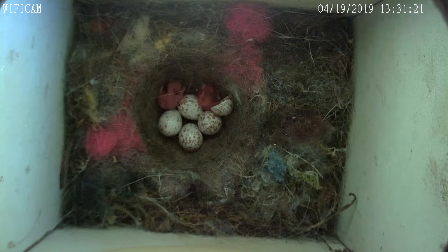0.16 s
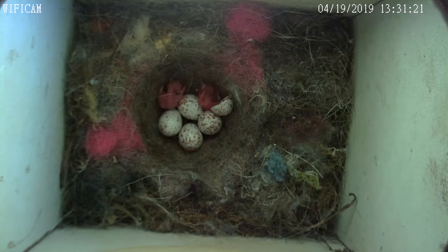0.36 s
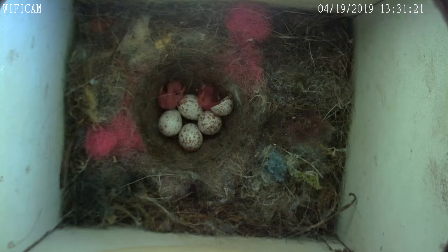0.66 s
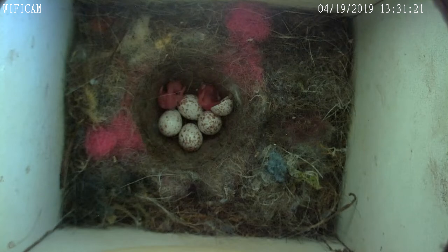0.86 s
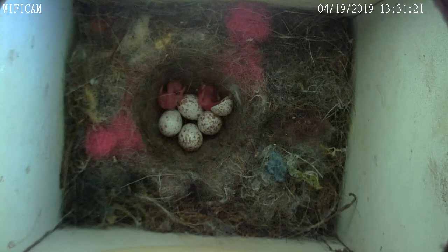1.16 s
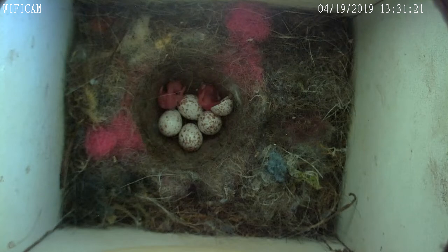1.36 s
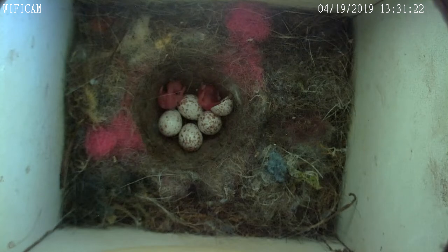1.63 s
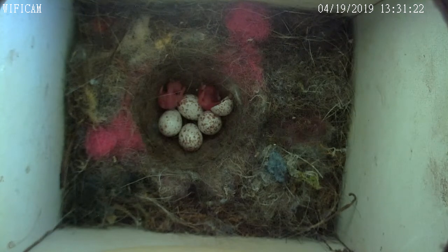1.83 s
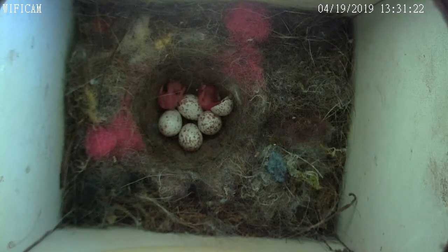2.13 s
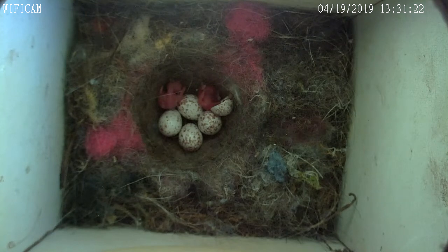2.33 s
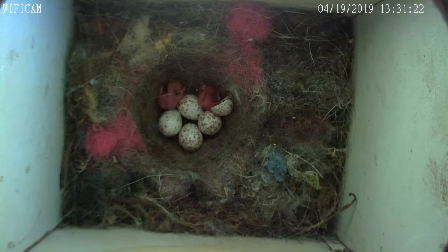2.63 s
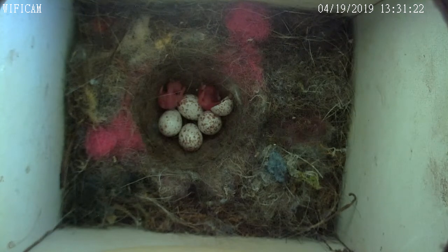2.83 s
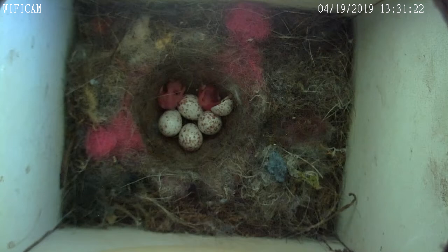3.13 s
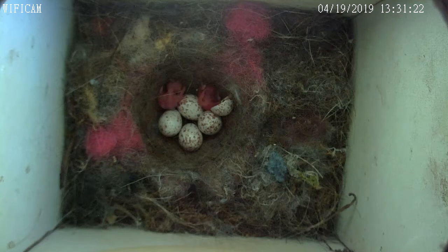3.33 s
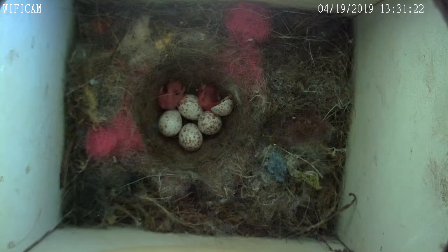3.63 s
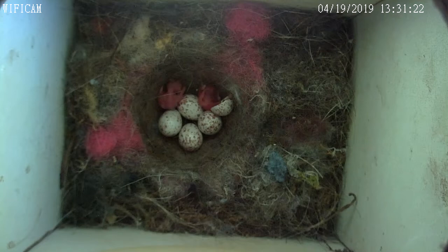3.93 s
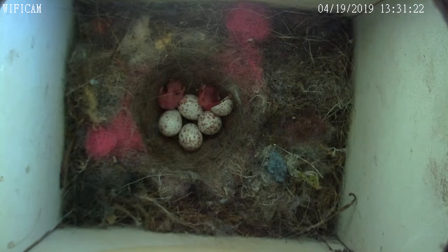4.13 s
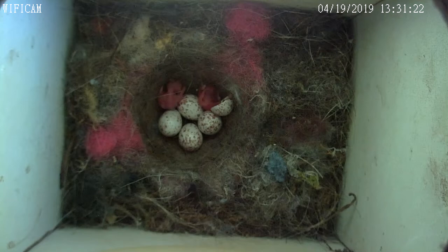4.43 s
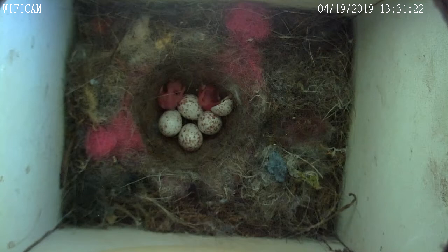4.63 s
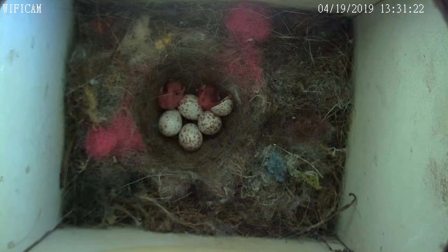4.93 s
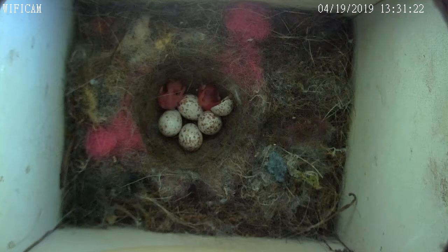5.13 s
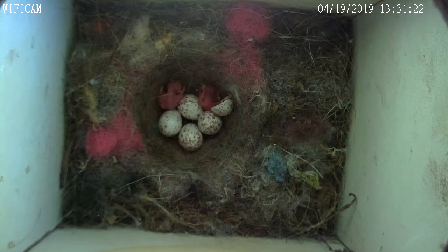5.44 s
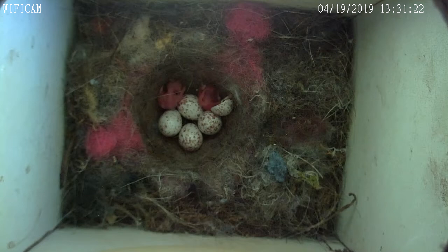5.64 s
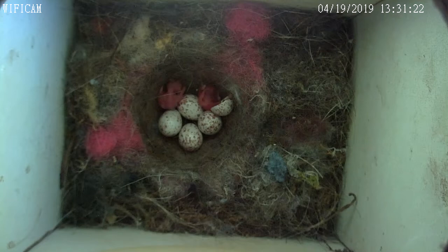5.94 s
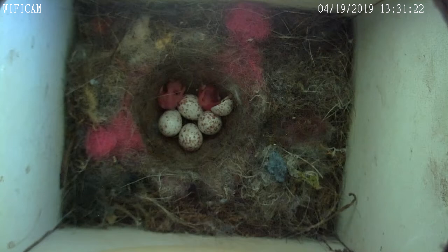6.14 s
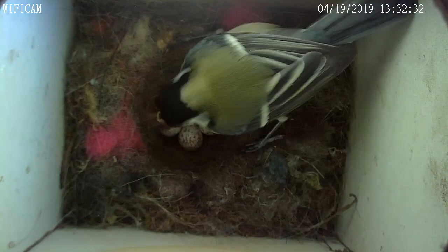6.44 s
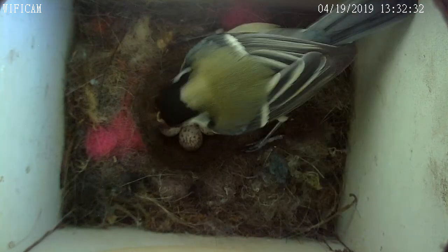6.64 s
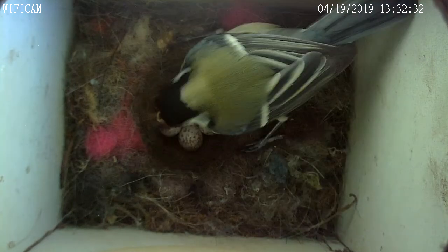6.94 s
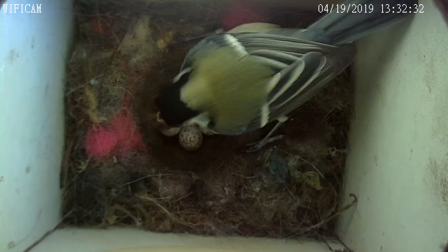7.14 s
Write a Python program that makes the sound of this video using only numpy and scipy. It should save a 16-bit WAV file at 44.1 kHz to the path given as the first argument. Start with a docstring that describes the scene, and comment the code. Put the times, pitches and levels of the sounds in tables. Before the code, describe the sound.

A near bird's short sliding whistles and other birds' rapid chirping echo lightly outdoors above a quiet brook-like trickle with small drips and gurgles.

```python
"""From the start a brook trickles over a slow subsonic wobble: noise bands hiss, ringing bubbles climb in pitch.
At once small birds twitter farther off in a garden and a songbird whistles close by on the left: gliding sines.
Fluttering notes (modulated sines) soon join, then ticking drops and gliding large bubbles, later spray of
high-passed noise. Decaying noise gives the birds their echoes. The song's last short note comes at the very
end, over the running brook."""
import sys
import numpy as np
from scipy import signal
from scipy.io import wavfile
from scipy.ndimage import uniform_filter1d

SR = 44100
rng = np.random.default_rng(int(sys.argv[2]) if len(sys.argv) > 2 else 0)


def master_out(mix):
    """Clip the mix to full scale and print it as 16-bit PCM to the path in sys.argv[1]."""
    frames = np.transpose(np.atleast_2d(mix))
    ceiling = np.clip(frames, -1, 1)
    pcm = np.round(ceiling * 32767).astype(np.int16)
    wavfile.write(sys.argv[1], SR, pcm)


N = 321489


def amp(db):
    """Level definition: 20 dB are a factor of ten in amplitude."""
    return 10 ** (np.asarray(db) / 20)


def rms_one(x):
    """Normalisation to unit root mean square."""
    return x / np.sqrt(np.mean(x ** 2) + 1e-20)


def at_hz(points, hz):
    """Interpolation of a spectrum along a logarithmic frequency axis."""
    table = np.array(points)
    return np.interp(np.log(hz), np.log(table[:, 0]), table[:, 1])


def panned(x, pan_db):
    """Intensity stereophony: left and right differ by pan_db and their mean stays x."""
    left = 2 / (1 + amp(-pan_db))
    return x * np.array([[left], [2 - left]])


def drift(rate_hz):
    """Random modulation: noise through a double pole at rate_hz wanders slowly with unit rms."""
    step = 40   # samples between computed values
    pole = np.exp(-2 * np.pi * rate_hz * step / SR)
    noise = rng.standard_normal(N // step + 2002)
    slow = signal.lfilter([1], [1, -2 * pole, pole * pole], noise)[2000:]   # settled part only
    return np.interp(np.arange(N) / step, np.arange(len(slow)), rms_one(slow))


def unsteady(cut_hz):
    """Modulation sidebands: multiplied by low-passed noise, a tone smears into a band."""
    low_pass = signal.butter(2, cut_hz, fs=SR, output="sos")
    return rms_one(signal.sosfilt(low_pass, rng.standard_normal(N)))


def add(out, start_s, sound):
    """Superposition: a stereo sound is summed in at its time."""
    i = max(round(start_s * SR), 0)
    out[:, i:i + sound.shape[1]] += sound[:, :N - i]


def whistle(s, hz, db, edge_s):
    """Frequency modulation: phase integrates a rounded glide; the tone starts edge_s before its first point."""
    t = np.arange(s[0] - edge_s, s[-1] + edge_s, 1 / SR)
    pitch = uniform_filter1d(np.interp(t, s, hz), size=150, mode="nearest")
    fade = np.clip(np.minimum(t - t[0], t[-1] - t) / (2 * edge_s), 0, 1)
    level = amp(np.interp(t, s, db)) * np.sin(fade * np.pi / 2) ** 2
    phase = 2 * np.pi * np.cumsum(pitch) / SR
    return np.sqrt(2) * level * np.sin(phase)


# subsonic swings: (frequency [Hz], level [dB rms])
WOBBLE_TONES = [(3.9, -53), (5.8, -51), (11.7, -60.5)]


def wobble():
    """Infrasound: steady sines below hearing, in phase in both channels."""
    t = np.arange(N) / SR
    tones = []
    for hz, db in WOBBLE_TONES:
        tones.append(np.sqrt(2) * amp(db) * np.sin(2 * np.pi * (hz * t + rng.random())))
    return sum(tones)


# relative power spectrum of the water hiss: (frequency [Hz], density [dB per Hz])
HISS_SPECTRUM = [(12, -30), (20, -20.5), (36, -19), (59, -21), (112, -35), (289, -33.5), (565, -32.5),
                 (2920, -29.5), (4430, -39), (5530, -38), (11400, -46.5), (15500, -50)]
# likeness of left and right: (frequency [Hz], correlation [-1 to 1])
HISS_LIKENESS = [(30, 0.31), (150, 0.87), (400, 0.37), (2000, 0.29), (10000, 0.19)]


def water_hiss(patchy_db):
    """Band-filtered noise: half-octave bands, each with its own level, flicker and stereo correlation."""
    out, together = 0, drift(6)
    edges = 20 * 2 ** np.arange(0, 10.1, .5)
    white = rng.standard_normal((2, 2, N))   # neighbouring bands take turns between two noises
    for k, (low, high) in enumerate(zip(edges, edges[1:])):
        band = signal.butter(2, [low, high], "band", fs=SR, output="sos")
        mid, side = signal.sosfilt(band, white[k % 2])
        hz = np.sqrt(low * high)
        alike = np.clip(at_hz(HISS_LIKENESS, hz), -1, 1)
        flicker_db = patchy_db * (.8 * together + drift(23))
        gain = amp(at_hz(HISS_SPECTRUM, hz) + flicker_db)
        out = out + gain * (np.sqrt(1 + alike) * mid + np.sqrt(1 - alike) * side * [[1], [-1]])
    return rms_one(out)


def small_bubbles(count, low_hz, high_hz, cycles, rise, tilt_db, spread_db):
    """Damped resonance: bubbles at random times and places ring a few cycles while their pitch climbs."""
    out = np.zeros((2, N))
    for when, size, loud, place, climb in rng.random((count, 5)):
        hz = low_hz * (high_hz / low_hz) ** size
        turns = np.arange(int(cycles * SR / hz)) * hz / SR
        envelope = (1 - np.exp(-turns)) * amp(-40 * turns / cycles)
        ring = envelope * np.sin(2 * np.pi * turns * (1 + rise * climb * turns / cycles))
        level_db = tilt_db * size - spread_db * np.log(loud + 0.029)
        add(out, when * N / SR, panned(ring * amp(level_db), 18 * (place - .45)))
    return rms_one(out)


# farther birds, a chirp a row: (start [s], length [s], start pitch [Hz], turn pitch [Hz], end pitch [Hz],
# place of the turn [0-1], level before swell and high loss [dB], left minus right [dB])
TWITTER_CHIRPS = [(0.035, 0.029, 4030, 4400, 4800, 0.75, -57.5, 6),
                  (0.089, .01, 2840, 3730, 2860, 0.4, -49.5, 8),
                  (0.496, 0.027, 3200, 3230, 4050, 0.8, -62, -4),
                  (0.642, .04, 3610, 3000, 2320, 0.56, -59.5, -1),
                  (0.786, 0.041, 4850, 5040, 4600, 0.5, -52.5, 9),
                  (.874, 0.027, 4700, 5000, 4070, .25, -55, 8),
                  (0.955, 0.027, 3720, 4650, 3870, .4, -61, -1),
                  (1.02, 0.017, 4050, 3950, 3600, 0.67, -54, 7),
                  (1.021, .009, 3110, 3100, 3020, .5, -56, 5),
                  (1.043, 0.0083, 3260, 3100, 2970, .5, -50.5, 5),
                  (1.04, 0.014, 4050, 4160, 3650, 0.8, -48, 7),
                  (1.065, 0.018, 3940, 3720, 3350, 0.5, -50.5, 12),
                  (1.086, .06, 3720, 3420, 3160, 0.7, -52.5, 6),
                  (1.087, 0.061, 2970, 2760, 2590, 0.4, -57, 3),
                  (1.311, 0.028, 3070, 3500, 3130, 0.36, -55, 5),
                  (1.329, .028, 2490, 3950, 4820, 0.13, -53, 6),
                  (1.359, 0.019, 4250, 4490, 4600, 0.5, -52, 6),
                  (1.417, 0.019, 4090, 4140, 2940, 0.36, -47, 7),
                  (1.441, .032, 3800, 3440, 2700, 0.59, -46.5, 4),
                  (1.477, 0.035, 3360, 3180, 4440, 0.4, -48.5, 2),
                  (1.763, 0.028, 3730, 2160, 3580, 0.7, -53.5, 13),
                  (1.767, .024, 4220, 3930, 3290, 0.26, -51, -1),
                  (1.814, 0.028, 2650, 3960, 4420, 0.54, -50, 0),
                  (1.884, 0.035, 3220, 4330, 4480, 0.22, -51, 7),
                  (1.952, 0.051, 4500, 4000, 4770, .42, -56, 2),
                  (1.99, 0.019, 4370, 4040, 3400, 0.72, -55.5, -1),
                  (1.992, 0.072, 2165, 1813, 1690, .36, -65, -2),
                  (2.222, 0.014, 3025, 2080, 3200, 0.36, -49.5, 8),
                  (2.292, 0.032, 4040, 4020, 4700, 0.4, -56, -1),
                  (2.325, 0.015, 4630, 3850, 3450, 0.46, -58, -1),
                  (2.373, 0.039, 2530, 4180, 4680, 0.39, -52.5, 5),
                  (2.464, .016, 5600, 4860, 3640, 0.43, -55, 5),
                  (2.59, 0.014, 2970, 3180, 4240, 0.54, -56, 4),
                  (2.601, 0.048, 2980, 4335, 4420, .4, -48.5, 8),
                  (2.691, 0.023, 3840, 3940, 3030, 0.33, -46, 8),
                  (2.718, 0.012, 2670, 2930, 3000, 0.43, -51.5, -1),
                  (2.73, 0.022, 3610, 3535, 2750, .4, -42, 6), (2.755, .012, 2750, 3200, 3420, .6, -41, 4),
                  (2.765, .006, 3320, 3000, 2670, 0.47, -46, 6),
                  (2.85, 0.036, 3740, 4360, 4370, 0.73, -48, 2),
                  (2.976, 0.029, 3800, 3960, 3380, 0.5, -49, 9),
                  (3.003, 0.0083, 4480, 3690, 2900, 0.46, -46.5, 4),
                  (3.025, 0.045, 2990, 3260, 4200, 0.44, -50.5, 2),
                  (3.113, .025, 2630, 2360, 2000, 0.8, -61, -1),
                  (3.8, 0.027, 2680, 2686, 2540, 0.8, -50.5, 2),
                  (4.525, 0.049, 3260, 3840, 3660, 0.44, -46.5, -1),
                  (4.798, 0.037, 3390, 3420, 3280, 0.37, -57.5, -1),
                  (4.867, 0.048, 2433, 2450, 2450, 0.9, -57.5, 0),
                  (4.938, 0.041, 5610, 6470, 3960, 0.63, -54, 2),
                  (5.196, 0.047, 2880, 3273, 3050, 0.88, -46, -1),
                  (5.254, 0.091, 2650, 3036, 3150, 0.57, -58, -5),
                  (5.317, 0.062, 1184, 1847, 2000, 0.26, -52.5, 4),
                  (5.482, 0.042, 2215, 2400, 2450, .3, -59.5, -4),
                  (5.7, 0.061, 2750, 3270, 3150, .7, -68, -18),
                  (5.74, 0.053, 2220, 2130, 2000, .5, -62, -5),
                  (5.84, 0.025, 2280, 2340, 2150, 0.5, -66, -10),
                  (5.918, 0.064, 3850, 3530, 3330, .45, -66.5, -11),
                  (5.93, 0.1, 1850, 1930, 1850, 0.54, -66.5, -17),
                  (6.128, 0.052, 2750, 2870, 2870, 0.26, -71.5, -22),
                  (6.255, 0.038, 3510, 3470, 3460, 0.55, -63.5, -13),
                  (6.492, 0.0063, 4340, 3430, 2930, 0.35, -53.5, -5),
                  (6.75, 0.055, 1770, 2360, 2510, 0.33, -58.5, 1)]
CHIRP_SWELL_DB = 5   # a chirp starts this far under its level
HIGH_LOSS_DB, BRIGHT_HZ = 5, 3200   # loss per octave over this pitch
SCRATCH, SCRATCH_PER_OCTAVE = .28, 1.7   # share of noise in a chirp, and its growth per octave over 4 kHz


def chirps():
    """Frequency sweep: notes glide through a turn; higher ones are weaker and smeared more by noise."""
    out, scratch = np.zeros((2, N)), unsteady(330)
    for start, length, from_hz, turn_hz, to_hz, turn, db, pan_db in TWITTER_CHIRPS:
        share = np.array([0, np.clip(turn, .05, .95), 1])
        hz = np.array([from_hz, turn_hz, to_hz])
        octaves_over = max(np.log2(turn_hz / 4000), 0)
        rough = np.clip(SCRATCH + SCRATCH_PER_OCTAVE * octaves_over, 0, 1)
        high_loss_db = HIGH_LOSS_DB * np.maximum(np.log2(hz / BRIGHT_HZ), 0)
        level_db = db - CHIRP_SWELL_DB * (share == 0) - high_loss_db
        note = whistle(start + length * share, hz, level_db, .004)
        noise = scratch[round(start * SR):][:len(note)]
        note = note * (np.sqrt(1 - rough ** 2) + rough * noise)
        add(out, start - .004, panned(note, pan_db))
    return out


# near singer, a note a row: (peak level before low loss [dB], time of the peak [s],
# glide as a list of (time [s], pitch [Hz]))
SONG_NOTES = [(-41, .11, [(.04, 1843), (.11, 2141), (.25, 2219), (.295, 2094)]), (-52, 0.597, [(.534, 3160),
              (.544, 2680), (.6, 2380)]), (-43, 1.572, [(1.524, 2146), (1.544, 2528), (1.585, 2673)]),
              (-40, 1.749, [(1.734, 3167), (1.768, 3034)]), (-44.5, 2.208, [(2.183, 2580), (2.21, 3054),
              (2.222, 3000)]), (-45, 2.835, [(2.791, 1810), (2.811, 2390), (2.85, 2730)]),
              (-37.5, 3.085, [(3.07, 2770), (3.079, 3186), (3.125, 3533), (3.145, 3475)]),
              (-36, 3.215, [(3.197, 4010), (3.204, 3250), (3.23, 2950)]), (-38, 3.448, [(3.41, 2850),
              (3.45, 2860), (3.47, 2530)]), (-43, 3.57, [(3.488, 2190), (3.547, 2310), (3.577, 2454),
              (3.617, 2540)]), (-44.5, 3.624, [(3.604, 3334), (3.64, 3520), (3.67, 3440)]),
              (-38, 3.752, [(3.71, 3690), (3.754, 3036), (3.821, 2910)]), (-43.5, 3.868, [(3.845, 3020),
              (3.876, 2905)]), (-43.5, 3.938, [(3.906, 3750), (3.918, 4000), (3.946, 3460)]),
              (-46.5, 4.012, [(4.0, 3200), (4.013, 2800), (4.035, 2544), (4.076, 2840)]),
              (-40.5, 4.22, [(4.108, 2074), (4.143, 1967), (4.19, 2665), (4.228, 2710)]),
              (-36.5, 4.397, [(4.345, 3400), (4.352, 3920), (4.362, 3410), (4.398, 3137), (4.417, 2902),
              (4.442, 2903)]), (-39, 4.575, [(4.54, 2756), (4.605, 2950), (4.634, 2526), (4.679, 2150)]),
              (-47, 4.64, [(4.615, 3194), (4.635, 2800), (4.72, 2820), (4.774, 2660)]),
              (-39.5, 5.075, [(5.065, 3130), (5.078, 3105), (5.098, 2780), (5.186, 2657)]),
              (-44.5, 5.29, [(5.256, 2343), (5.296, 2450), (5.308, 1940)]), (-40, 5.555, [(5.483, 3930),
              (5.495, 4050), (5.505, 3590), (5.56, 2990), (5.585, 3074)]), (-46.5, 6.84, [(6.814, 3030),
              (6.821, 3000), (6.84, 2686), (6.899, 2760), (6.925, 1970)]), (-48, 7.281, [(7.268, 1840),
              (7.281, 2000), (7.288, 2000)])]
SWELL_DB, SINK_DB, SWELL_BEND = 10.5, 6.5, 3   # start and end under the peak; roundness of the top
WAVER_HZ = 18.7   # rms tremble of the pitch
LOW_LOSS_DB, FULL_HZ = 11, 2890   # loss per octave under this pitch
SINGER_PAN_DB = 5.5   # left minus right


def song():
    """Joint amplitude and frequency modulation: a note swells and sinks along its rounded, trembling glide."""
    out, waver = np.zeros((2, N)), WAVER_HZ * drift(50)
    for peak_db, loudest, glide in SONG_NOTES:
        at, hz = np.transpose(glide)
        s = np.linspace(at[0], at[-1], 60)
        before = np.clip((loudest - s) / (loudest - s[0]), 0, 1)
        after = np.clip((s - loudest) / (s[-1] - loudest), 0, 1)
        db = peak_db - SWELL_DB * before ** SWELL_BEND - SINK_DB * after ** SWELL_BEND
        pitch = uniform_filter1d(np.interp(s, at, hz), size=7, mode="nearest")
        pitch = pitch + np.interp(s * SR, np.arange(N), waver)
        db = db - LOW_LOSS_DB * np.maximum(np.log2(FULL_HZ / pitch), 0)
        add(out, s[0] - .003, panned(whistle(s, pitch, db, .003), SINGER_PAN_DB))
    return out


def garden(x, t60):
    """Reverberation by convolution: leaves and walls answer with lumpy dying noise, own in each channel."""
    t = np.arange(SR // 2) / SR
    lumps = amp(4 * drift(90)[:len(t)])   # some surfaces throw back distinct echoes
    envelope = lumps * amp(-60 * t / t60) * np.clip(t / 0.0041, 0, 1)
    tail = rng.standard_normal((2, len(t))) * envelope
    tail = tail / np.sqrt(np.sum(tail ** 2) / 2)   # unit energy per channel on average
    return signal.fftconvolve(x.mean(0)[None], tail, axes=1)[:, :N]


# fluttering notes: (start [s], end [s], start pitch before arch [Hz], end pitch before arch [Hz],
# level before arch and throb [dB], left minus right [dB], flutter rate [Hz], flutter depth [Hz], throb [dB])
FLUTTER_NOTES = [(.312, .452, 1900, 1850, -55.5, 8, 66, 140, -1),
                 (3.228, 3.282, 2770, 2740, -42, 6, 68, 110, 3),
                 (3.943, 4.0, 3400, 3340, -40, 5, 94, 60, 5),
                 (4.15, 4.183, 4700, 3920, -58.5, 0, 130, 700, 3),
                 (4.485, 4.511, 4860, 4240, -60.5, 0, 153, 705, 3),
                 (4.968, 5.01, 5230, 4180, -60, 0, 120, 600, 3)]
TRILL_ARCH_DB, TRILL_ARCH_HZ = 4, 90   # scale of the drop in level and pitch toward the ends


def trills():
    """Periodic modulation: a cosine flutters pitch and level together, along an arch over the note."""
    out = np.zeros((2, N))
    for start, end, from_hz, to_hz, db, pan_db, rate, depth_hz, throb_db in FLUTTER_NOTES:
        s = np.linspace(start, end, 200)
        flutter = np.cos(2 * np.pi * rate * (s - start))
        ends = np.linspace(-1.2, .8, len(s)) ** 2   # zero at the top of the arch
        hz = np.linspace(from_hz, to_hz, len(s)) + depth_hz * flutter - TRILL_ARCH_HZ * ends
        level_db = db + throb_db * flutter - TRILL_ARCH_DB * ends
        add(out, start - .004, panned(whistle(s, hz, level_db, .004), pan_db))
    return out


# ticking drops: (time [s], envelope level after one cycle [dB], pitch [Hz], left minus right [dB])
DROP_TICKS = [(0.332, -43.5, 5500, 6), (1.009, -43, 5140, 5), (1.713, -40.5, 5630, 8),
              (2.92, -41, 1470, -6), (3.288, -44.5, 6770, 6), (3.8955, -44, 6000, 6.0),
              (4.1178, -38, 7800, 9), (4.456, -44, 4330, 4), (4.4854, -43, 4230, 17),
              (4.504, -37, 4410, -5), (4.908, -34, 3960, -1), (4.9144, -40, 7600, -1),
              (5.0386, -40, 6950, 0.0)]


def drops():
    """Heavily damped oscillation: a tick dies within six cycles."""
    out = np.zeros((2, N))
    for s, db, hz, pan_db in DROP_TICKS:
        turns = np.arange(int(6 * SR / hz)) * hz / SR
        envelope = amp(db - 8 * (turns - 1)) * np.minimum(turns, 1)
        add(out, s, panned(envelope * np.sin(2 * np.pi * turns), pan_db))
    return out


# large bubbles: (time [s], length [s], start pitch [Hz], end pitch [Hz], level before churn [dB])
LARGE_BUBBLES = [(0.538, 0.033, 762, 1080, -58), (1.493, 0.021, 708, 860, -57.5),
                 (2.017, 0.016, 1095, 1120, -57), (2.679, 0.044, 422, 873, -56.5),
                 (2.924, 0.018, 507, 456, -52.5), (4.328, 0.038, 673, 493, -57.5),
                 (4.95, 0.043, 420, 1060, -52.5), (5.195, 0.026, 1085, 1030, -59.5),
                 (5.239, 0.042, 427, 960, -49), (5.273, 0.0071, 1150, 1240, -51.5),
                 (5.315, 0.055, 368, 585, -61.5), (5.357, 0.0075, 865, 890, -49.5),
                 (7.022, 0.013, 1770, 2450, -56.5), (7.024, .016, 1230, 2240, -56)]


def gurgles():
    """Gliding resonance: large bubbles sweep in pitch, their amplitude modulated by noise."""
    out = np.zeros((2, N))
    churn = .8 + .5 * unsteady(120)   # large bubbles wobble as they rise
    for s, length, from_hz, to_hz, db in LARGE_BUBBLES:
        swell = whistle([s, s + length], [from_hz, to_hz], [db, db], .005)
        add(out, s - .005, panned(swell * churn[round(s * SR):][:len(swell)], -.5))
    return out


# fine spray: (time [s], length [s], noise level before window and filter [dB])
SPRAY_BURSTS = [(1.957, 0.054, -57), (2.036, 0.069, -58.5), (4.911, 0.012, -51.5), (5.717, 0.023, -56)]


def splashes():
    """High-passed noise: each burst of spray swells and fades under a raised-cosine window."""
    out = np.zeros((2, N))
    high_pass = signal.butter(4, 9500, "high", fs=SR, output="sos")
    for s, length, db in SPRAY_BURSTS:
        count = round(length * SR)
        spray = rng.standard_normal((2, count)) * np.hanning(count)
        add(out, s, amp(db) * signal.sosfilt(high_pass, spray))
    return out


# liveliness of the small bubbles: (time [s], gain [dB])
BUBBLE_FLOW = [(0, 1), (2.4, -0.5), (3.8, 1), (4.3, 3), (5.3, 5.5), (5.8, -1), (7.29, 0)]
WATER_DB, BABBLE_DB, FIZZ_DB = -62, -65.5, -75   # rms levels; babble and fizz before the flow


def brook():
    """Superposition of water sounds: steady hiss, babble and fizz that follow the flow, and single events."""
    flow = amp(np.interp(np.arange(N) / SR, *np.transpose(BUBBLE_FLOW)))
    hiss = amp(WATER_DB) * water_hiss(patchy_db=1.2)
    babble = small_bubbles(count=1600, low_hz=373.3, high_hz=2309, cycles=41.7,
                           rise=0.52, tilt_db=10.5, spread_db=3.5)
    fizz = small_bubbles(count=1000, low_hz=4500, high_hz=15000, cycles=11,
                         rise=.2, tilt_db=-5, spread_db=2.6)
    bubbles = flow * (amp(BABBLE_DB) * babble + amp(FIZZ_DB) * fizz)
    return hiss + bubbles + drops() + gurgles() + splashes()


def birds():
    """Random amplitude modulation: the song together with the fluttering notes, and the farther chirps, each
    waver quickly in level."""
    far = chirps() * amp(2 * drift(80))
    song_and_trills = (song() + trills()) * amp(1.1 * drift(60))
    return song_and_trills, far


def scene():
    """Direct sound plus reverberation: the farther chirps have the stronger echoes; the song and the fluttering
    notes share a weaker one."""
    song_and_trills, far = birds()
    song_and_trills_echo = amp(-8.5) * garden(song_and_trills, t60=.48)
    far_echo = amp(-3) * garden(far, t60=0.38)
    return song_and_trills + far + song_and_trills_echo + far_echo + brook() + wobble()


def record(dry):
    """Low-pass filtering: a steep elliptic filter cuts the top above 15.7 kHz."""
    return signal.sosfilt(signal.ellip(12, .5, 70, 15700, fs=SR, output="sos"), dry)


dry = scene()
out = record(dry)
master_out(out)
```